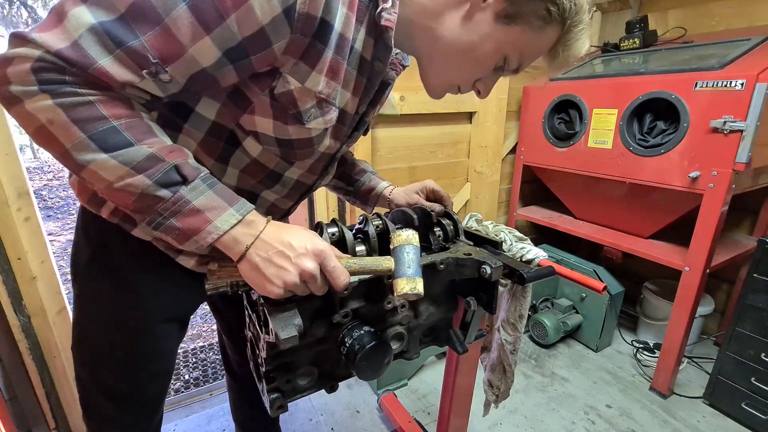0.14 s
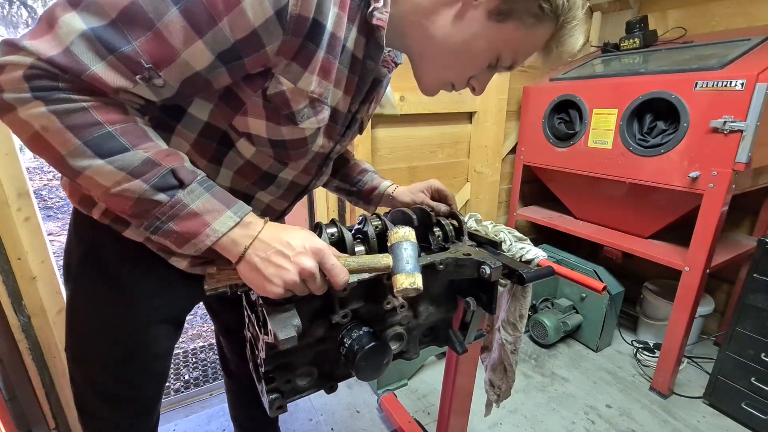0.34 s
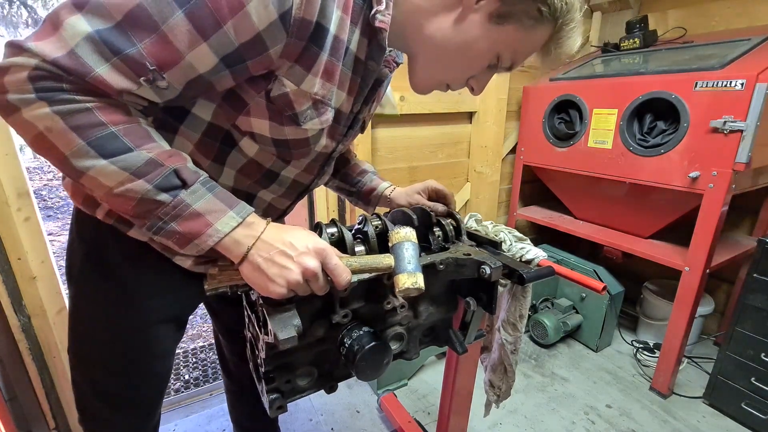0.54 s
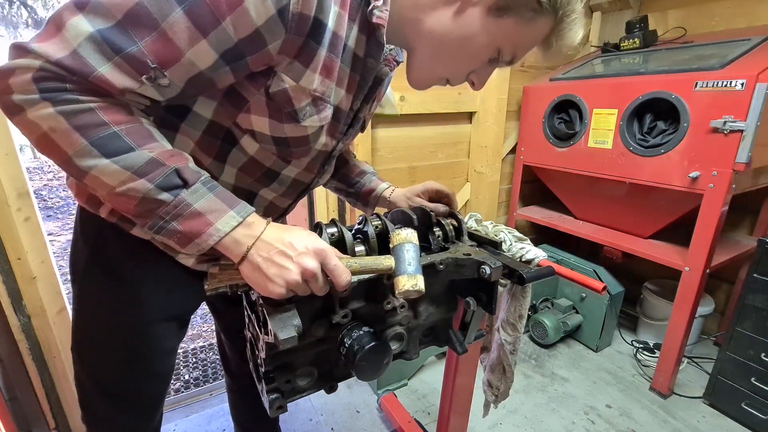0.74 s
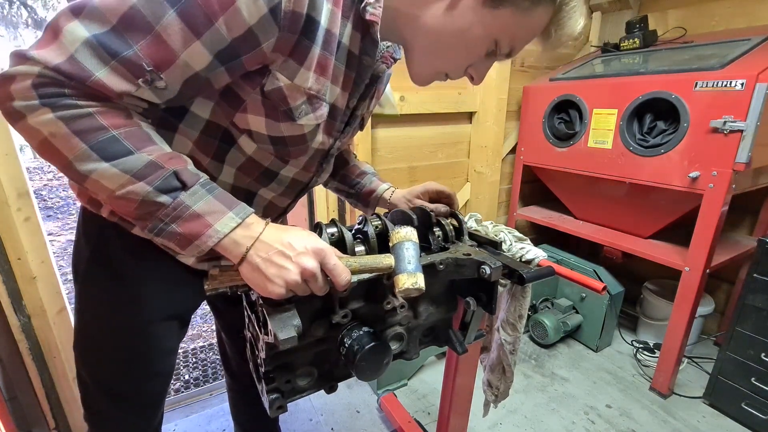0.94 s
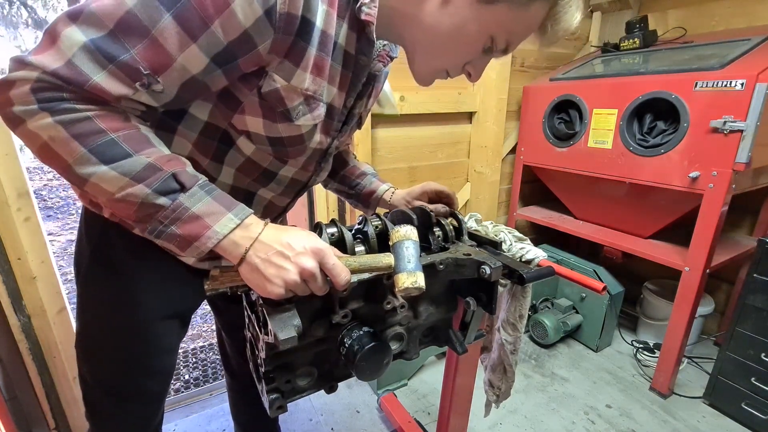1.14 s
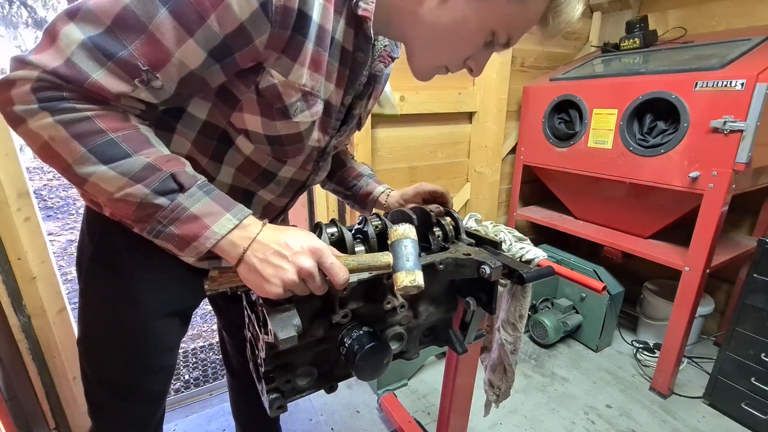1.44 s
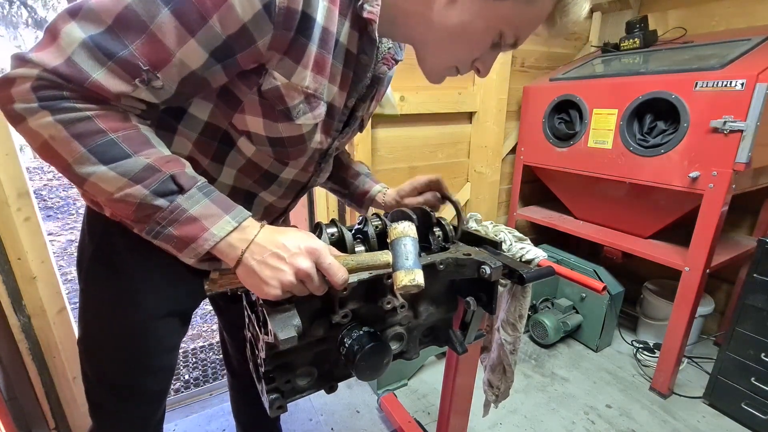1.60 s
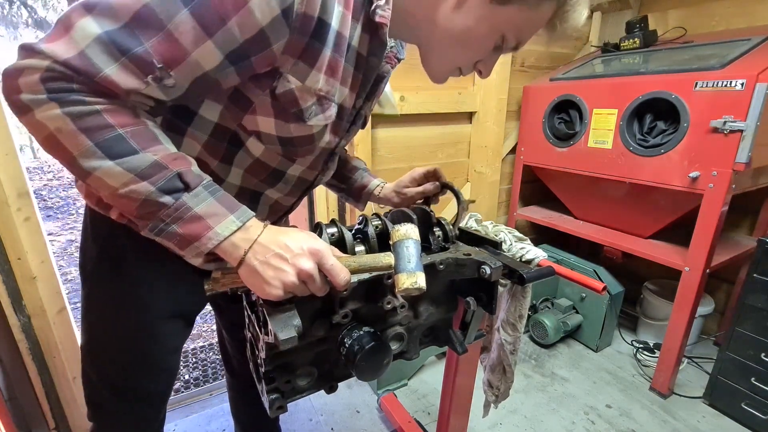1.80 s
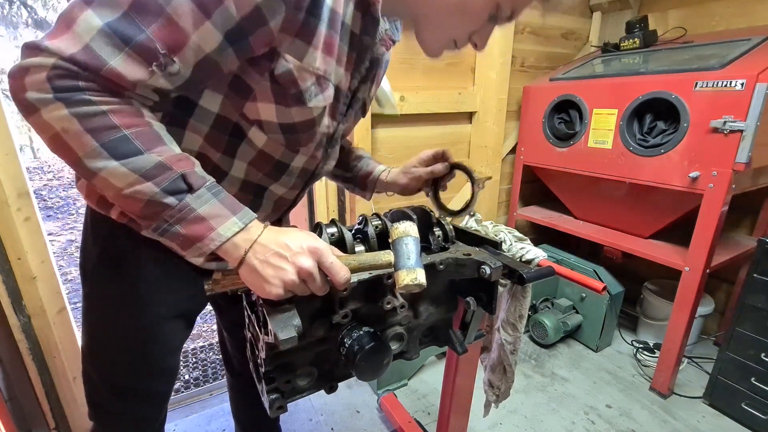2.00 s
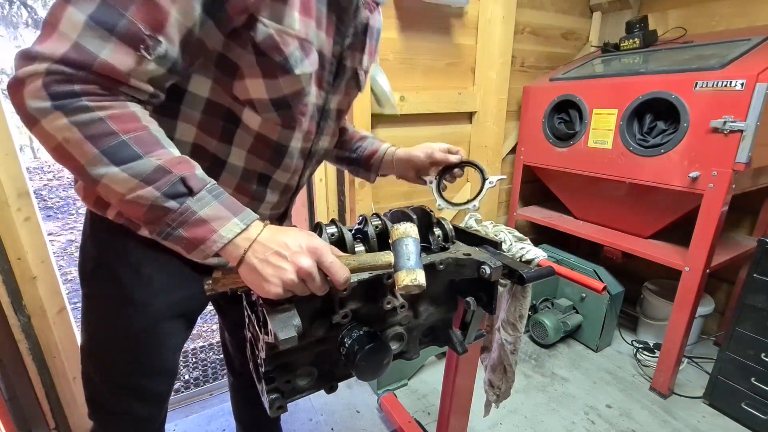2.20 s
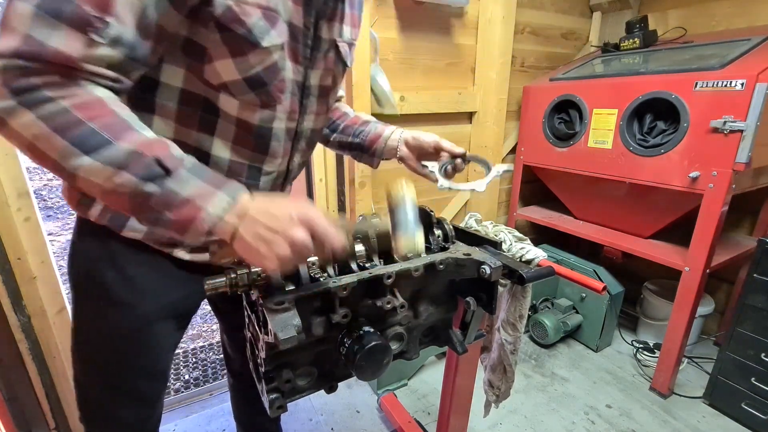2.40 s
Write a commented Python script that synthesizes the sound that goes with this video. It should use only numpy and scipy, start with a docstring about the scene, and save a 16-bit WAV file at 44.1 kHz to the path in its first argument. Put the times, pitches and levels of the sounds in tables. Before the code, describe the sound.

A mallet strikes a metal engine part with a sharp, bright clang; after a pause with faint knocks and a tiny squeak, a second blow loosens it with a short clatter. Small wooden workshop, close stereo microphone.

```python
"""A sleeve rubs over faint hum and hiss, then a hard blow rings out in a small wooden workshop.
A metal seal housing is being knocked loose from an engine block on a stand. Each of two hard blows is a quick
run of contacts; between them the part squeaks and knocks, and afterwards it clatters dully.
Bands of noise make the cracks, dense ringing and air; sine tones make the clear ring of the metal and the hum;
noise in a narrow gliding band makes the squeak."""
import sys
import numpy as np
from scipy import signal
from scipy.fft import rfft, irfft
from scipy.io import wavfile
from scipy.ndimage import uniform_filter1d

SR = 44100
rng = np.random.default_rng(int(sys.argv[2]) if len(sys.argv) > 2 else 0)


def output_pcm(signal):
    """Save a mono or channel-first signal as 16-bit PCM at the path in sys.argv[1].

    Samples are clipped to [-1, 1] before scaling.
    """
    pcm = np.clip(np.atleast_2d(signal).T, -1, 1) * 32767
    wavfile.write(sys.argv[1], SR, np.round(pcm).astype(np.int16))


N = 112454
TIME = np.arange(N) / SR
BANDS_HZ = 25 * 2 ** (np.arange(29) / 3)  # centres of the third-octave bands
TREBLE_HZ = 2410  # the treble slope of a contact starts here

# Every knock, clatter and thump of the stand. Each row: start in seconds, level in dB, extra thump of the
# stand in dB, extra low body in dB, treble slope in dB per octave, centre of the clang in Hz, extra block
# tones in dB, extra housing ring in dB, extra sharp crack in dB.
CONTACTS = [(0.112, -53, 1.5, -10.5, 4, 2592, -1, -10.5, 4.5),
            (0.2228, -7, -1.5, -6.5, 1.5, 2850, -7, -1, 8.5),
            (0.235, 3, -1, -4.5, -2, 2753, -2, -1.5, -1.5), (0.245, -2, -2, 2.5, -5.5, 2690, -4, -1, -8.5),
            (0.46, -57.5, 43.5, 15, -17, 2970, 7.5, -11, -16),
            (0.595, -36.5, -10, 0, -1, 2550, 1.5, -17, 0), (0.62, -46.5, 13, 25, -24, 2670, -5.5, -11, -11),
            (0.789, -68, 5, 29.5, -18, 2600, 3.5, -17, -15),
            (1.263, -23.5, -13.5, -11, -18, 2800, -0.5, -11.5, 0),
            (1.285, -38, -1, 12.5, -7, 2810, -2, -12, -8), (1.5995, -23, 17, 7.5, -7, 2200, -5, 3.5, -6),
            (1.609, -15.5, 8, 8, -4, 2230, 2.5, -5, -13), (1.619, -3.5, -23, -0.5, -4, 2420, -0.5, 3.5, 0),
            (1.641, -7, -23, 4.5, -6, 2350, -5, -0.5, 4.5), (1.682, -23, -28, 8, -6.5, 2450, 3, 17, 7),
            (1.792, -45, -5.5, 20, -31, 2400, -2.5, 19, -7), (1.88, -40.5, 6, 13.5, -8, 2400, 1.5, 23, -10),
            (1.902, -41.5, 11, 20, -24, 2380, -1, -5, -13), (2.223, -58, 2, -15, -5, 3350, -16, -15.5, 9)]


def from_db(db):
    """Turn decibels into gain."""
    return 10 ** (np.asarray(db) / 20)


def at_hz(points, hz):
    """Read a table of (Hz, value) at one pitch, with pitch counted in octaves."""
    table_hz, values = np.transpose(points)
    return np.interp(np.log(hz), np.log(table_hz), values)


def in_time(rows):
    """Draw straight lines between the rows of a control curve, one value per sample."""
    seconds, *columns = np.transpose(rows)
    return [np.interp(TIME, seconds, column) for column in columns]


def panned(db):
    """Left and right gains that differ by this many dB, with the same total power."""
    gains = from_db([[db / 2], [-db / 2]])
    return gains / np.sqrt(np.mean(gains ** 2))


def noise_bands(ripple_db):
    """Third octaves of stereo noise, alike on both sides in the bass; a random ripple makes the treble uneven."""
    # How alike left and right are. Each row: pitch in Hz, correlation (1 means the same).
    likeness = [(50, 0.83), (150, .92), (350, 0.91), (700, 0.0059), (1500, 0.0025), (12000, 0)]
    ripple_step_hz = 49.2
    size = N + SR // 4  # the extra start lets the filters settle
    line_hz = np.arange(size // 2 + 1) * SR / size
    ripple_points = rng.standard_normal(SR // 10)
    ripple = np.interp(line_hz / ripple_step_hz, np.arange(SR // 10), ripple_points)
    ripple_gain = from_db(ripple_db * ripple * line_hz / (line_hz + TREBLE_HZ))
    spectrum = rfft(rng.standard_normal((2, 2, size)))
    white = irfft(spectrum * ripple_gain, size)
    for k, hz in enumerate(BANDS_HZ):
        edges = hz * 2 ** (np.array([-1, 1]) / 6)
        band_filter = signal.butter(3, edges, "band", fs=SR, output="sos")
        pair = signal.sosfilt(band_filter, white[k % 2])[:, -N:]  # neighbours use different noise
        mid, side = pair / pair.std(axis=1, keepdims=True)
        alike = at_hz(likeness, hz)
        stereo = np.sqrt(1 + alike) * mid + np.sqrt(1 - alike) * side * [[1], [-1]]
        yield hz, stereo / np.sqrt(2)


def ringing(db, t60, build_s):
    """Loudness curve of a vibration fed by every contact: its energy builds up, then dies away."""
    kicks = np.zeros(N)
    kicks[(np.array(CONTACTS)[:, 0] * SR).astype(int)] = from_db(db) ** 2
    keep = np.exp(-np.log(1e6) / (t60 * SR))  # falls 60 dB in t60 seconds
    fill = np.exp(-1 / (max(build_s, 1e-5) * SR))
    energy = signal.lfilter([1], [1, -keep], kicks + 1e-20)
    return np.sqrt(signal.lfilter([1 - fill], [1, -fill], energy))


def force_db(hz):
    """How strongly each contact drives one pitch: heavy ones push the bass, hard ones the treble."""
    thump_hz, body_hz = 108, 750  # upper limits of the thump and of the low body
    level, thump, body, slope = np.transpose(CONTACTS)[1:5]
    in_thump = 1 / (1 + (hz / thump_hz) ** 6)
    in_body = 1 / (1 + (hz / body_hz) ** 4)
    treble = slope * max(np.log2(hz / TREBLE_HZ), 0)
    return level + thump * in_thump + body * (in_body - in_thump) + treble


def mains_hum():
    """Steady sine tones of the mains hum."""
    # Each row: pitch in Hz, peak level in dB.
    hum_tones = [(99, -70.5), (200, -67.5), (300, -65.5), (500, -66.5)]
    return sum(from_db(db) * np.sin(2 * np.pi * (hz * TIME + rng.random())) for hz, db in hum_tones)


def air_and_sleeve(bands):
    """Steady hiss of the workshop air, and cloth friction: noise that fades as the sleeve stops rubbing."""
    # Hiss of the air. Each row: pitch in Hz, level in dB per third octave.
    air_table = [(25, -68), (35, -67), (70, -70), (130, -90), (250, -78), (450, -73), (800, -78.5),
                 (1300, -77.5), (2200, -86), (4500, -78), (5400, -83), (6500, -73.5), (8200, -92),
                 (12000, -88), (16000, -93)]
    # Colour of the rubbing cloth. Each row: pitch in Hz, dB per third octave before the fading below.
    sleeve_table = [(30, -54.5), (150, -65), (500, -71.5), (1500, -74), (3000, -77), (6000, -75.5),
                    (10000, -68.5), (15000, -75)]
    # Strength of the rub. Each row: time in seconds, change in dB.
    sleeve_fade = [(0, -0.5), (.1, -7.5), (.2, -1.5), (.26, -24)]
    fade_db, = in_time(sleeve_fade)
    rub = from_db(fade_db)
    out = 0
    for hz, noise in bands:
        air = from_db(at_hz(air_table, hz))
        sleeve = rub * from_db(at_hz(sleeve_table, hz))
        out = out + noise * np.hypot(air, sleeve)  # the powers add
    return out


def friction(curve):
    """Friction noise in a narrow resonance that glides and changes width."""
    hz, width_hz, db = in_time(curve)
    steps = np.cumsum(width_hz) / SR  # a wider resonance wobbles faster
    slips = rng.standard_normal((2, 2, N // 8))
    wobble = np.array([np.interp(steps, np.arange(len(a)), a + 1j * b) for a, b in slips])
    sliding = (TIME > curve[0][0]) & (TIME < curve[-1][0])
    swell = from_db(db) * sliding
    for _ in range(2):
        swell = uniform_filter1d(swell, size=200)  # soft start and end
    carrier = np.exp(2j * np.pi * np.cumsum(hz) / SR)
    return np.real(wobble * carrier) * swell


def seal_squeak():
    """The sliding seal squeaks in a narrow band, and a rougher, wider scrape rises out of it."""
    # Each row: time in seconds, pitch in Hz, width in Hz, relative level in dB.
    squeak_curve = [(1.14, 3020, 90, -79), (1.16, 3080, 110, -67.5), (1.19, 3180, 171, -58.5),
                    (1.255, 3280, 410, -57.5), (1.28, 3330, 400, -75.5)]
    # The rougher scrape, with the same columns.
    scrape_curve = [(1.19, 3400, 302, -76), (1.215, 3620, 700, -58.5), (1.235, 4130, 1120, -55.5),
                    (1.26, 4190, 1110, -54.5), (1.31, 4270, 1000, -73.5)]
    return friction(squeak_curve) + friction(scrape_curve)


def metal_tones(mode_table, ring_db, lag_s, scatter):
    """Struck metal rings in clear sine tones; their mix changes from one stage of the work to the next."""
    # Ends of the first blow, the working loose and the second blow, in seconds; the clatter follows.
    stage_ends = [.4, 1.5, 1.75]
    stage = np.searchsorted(stage_ends, np.array(CONTACTS)[:, 0])
    heard_at = TIME - np.array([[0], [lag_s]])  # the right side hears later
    out = 0
    for hz, *stage_db, t60, pan_db in mode_table:
        # reflections shift the phase of each side, less so in the bass
        side_shift = scatter * hz / (hz + 440) * rng.uniform(-1, 1, (2, 1))
        cycles = rng.random() + side_shift
        tone = np.sin(2 * np.pi * (hz * heard_at + cycles))
        build_s = min(0.0034 + 0.46 / hz, 0.017)  # low tones need longer to build up
        swell = ringing(force_db(hz) + ring_db + np.array(stage_db)[stage], t60, build_s)
        out = out + tone * uniform_filter1d(swell, size=32) * panned(pan_db)
    return out


def block_ring():
    """The heavy block on its stand rings in many tones that die away fairly soon."""
    # Each row: pitch in Hz, dB in the first blow, dB in the light knocks, dB in the second blow,
    # dB in the clatter, time to fall 60 dB in seconds, left minus right in dB.
    block_modes = [(45.1, -23.5, -36, -45, -32, .085, -3), (70, -39, -39, -22, -36, 0.34, -3.5),
                   (101.2, -44, -20.5, -43.5, -26, 0.23, -6), (166.8, -26, -26.5, -27.5, -26, 0.4, -1),
                   (324.4, -23.5, -21.5, -37, -28.5, 0.16, -3.5),
                   (367, -25.5, -17.5, -22.5, -26.5, .27, -2.5), (464, -18, -15, -42.5, -15.5, .27, -6.5),
                   (497, -30.5, -26.5, -20.5, -26, .3, -3), (600, -25, -22, -29, -47, .27, -2),
                   (708, -32, -17, -28, -13, 0.2397, -4), (798, -18, -42, -38, -45, .18, 1.5),
                   (1057, -35.5, -22.5, -22.5, -33, .18, -3), (1206.5, -19.5, -25, -33.5, -20.5, 0.18, -6),
                   (1480, -33, -19.5, -42, -43, .18, -3), (1540, -21, -19.5, -23.5, -38, .18, -4),
                   (1625, -35.5, -16, -26.5, -27, .18, -3), (1791, -23, -28.5, -39, -34, 0.14, -2),
                   (1902, -19.5, -23, -13.5, -16, .2, -1.5), (2085, -20, -21, -22, -27, .15, 2.5),
                   (2160, -34, -50, -22, -9.5, .17, 3), (2400, -28.5, -40, -22, -10.5, .17, 4.5),
                   (2530, -27, -18, -22, -23, .15, 3.5), (2552, -29.5, -20, -20.5, -23.5, .27, 2.5),
                   (2595, -23, -13, -21, -18, .25, 3), (2703, -17, -16.5, -29, -36, .16, 4),
                   (2715, -17, -21, -37, -38, 0.18, 3), (2861, -14.5, -27, -35, -34, .17, 7),
                   (2955, -16, -17, -26, -25, .14, 3), (3095, -30.5, -19, -23.5, -20, .18, 4.5),
                   (3175, -28, -29, -24, -25, .21, 2.5), (3292, -18, -28, -38, -32, .14, 5),
                   (3600, -40, -37, -40, -42, .27, -3.5)]
    block_db = np.transpose(CONTACTS)[6]
    return metal_tones(block_modes, block_db, lag_s=0.0001, scatter=0.42)


def housing_ring():
    """The housing rings on in longer tones, until a hand closes on it and damps them."""
    # Each row: pitch in Hz, dB in the first blow, dB in the light knocks, dB in the second blow,
    # dB in the clatter, time to fall 60 dB in seconds, left minus right in dB.
    housing_modes = [(1873, -35, -27, -26.5, -32, .6, 7), (1933, -28.5, -24, -27.5, -39, .66, -2),
                     (2036, -37, -31, -26, -32, .54, 6.5), (2182, -25, -42, -39, -37, .28, -.5),
                     (2357, -24, -30, -26, -39, .3, 10), (2912, -24.5, -46, -41, -48, .28, 5),
                     (2983, -25.5, -37, -36.5, -41, .36, 11), (3381, -29.5, -43, -49, -52, .28, 4)]
    grip_at_s, grip_db_per_s = 2.04, 107
    housing_db = np.transpose(CONTACTS)[7]
    grip = from_db(-grip_db_per_s * np.maximum(TIME - grip_at_s, 0))
    return grip * metal_tones(housing_modes, housing_db, lag_s=0.00014, scatter=0.053)


def knocks(bands):
    """Each contact cracks, then the dense ring of the block clangs, fills the small room and fades."""
    # Dense ring of the cast block in the room. Each row: pitch in Hz, relative dB per third octave.
    block_colour = [(25, -44.5), (45, -31), (75, -38), (115, -50), (165, -42), (220, -40.5), (370, -26.5),
                    (620, -26), (800, -23), (1000, -24.5), (1600, -23.5), (2200, -23.5), (3000, -22.5),
                    (4000, -23), (6500, -24.5), (9000, -32), (15000, -36)]
    # How long that ring lasts. Each row: pitch in Hz, time to fall 60 dB in seconds.
    block_t60 = [(50, .33), (170, 0.51), (400, 0.2), (1000, 0.19), (2800, 0.21), (6000, .195),
                 (13000, 0.16)]
    # How slowly the room fills with sound. Each row: pitch in Hz, time in seconds.
    room_fill = [(50, 0.01197), (170, 0.01), (450, 0.0056), (1300, .008), (3000, .005), (10000, .004)]
    # Direct crack against the dense ring. Each row: pitch in Hz, dB.
    crack_colour = [(60, -24.5), (400, -11.5), (1300, -5), (3000, 1), (9000, 2.5)]
    # Late echoes of the workshop against the dense ring. Each row: pitch in Hz, dB.
    tail_colour = [(60, -26), (400, -22), (1200, -32.5), (3000, -43.5), (8000, -64)]
    # Stereo balance. Each row: pitch in Hz, left minus right in dB.
    balance = [(60, -3.5), (380, -4), (700, -0.5), (1300, -7), (2400, 4.5), (4400, 2), (8000, 1.5),
               (15000, 0)]
    crack_t60_s, tail_t60_s = 0.03, 0.46
    crack_pan_db = 6.5
    clang_db, clang_octaves = 7, 0.18  # height and width of the clang
    clang_hz, crack_db = np.transpose(CONTACTS)[[5, 8]]
    out = 0
    for hz, noise in bands:
        octaves_off = np.log2(hz / clang_hz)
        clang = clang_db * np.exp(-.5 * (octaves_off / clang_octaves) ** 2)
        db = force_db(hz) + at_hz(block_colour, hz) + clang
        fill_s = at_hz(room_fill, hz)
        crack = ringing(db + crack_db + at_hz(crack_colour, hz), crack_t60_s, 0) * panned(crack_pan_db)
        dense = ringing(db, at_hz(block_t60, hz), fill_s)
        tail = ringing(db + at_hz(tail_colour, hz), tail_t60_s, fill_s)
        swell = np.sqrt(crack ** 2 + dense ** 2 + tail ** 2)
        cycle = int(SR / max(hz, 500))
        for _ in range(2):
            swell = uniform_filter1d(swell, cycle)  # a band needs about a cycle to start
        out = out + noise * swell * panned(at_hz(balance, hz))
    return out


def scene():
    """Knocks, ringing metal and squeak over the quiet workshop."""
    background = air_and_sleeve(noise_bands(ripple_db=0)) + mains_hum()
    metal = block_ring() + housing_ring()
    return background + seal_squeak() + metal + knocks(noise_bands(ripple_db=5))


def record(dry):
    """Round off the loudest peaks, then cut the very top of the treble."""
    clip_top, cutoff_hz = 1.3, 16900
    rounded = clip_top * np.tanh(dry / clip_top)
    top_cut = signal.cheby2(20, 95, cutoff_hz, fs=SR, output="sos")
    return signal.sosfilt(top_cut, rounded)


dry = scene()
out = record(dry)
output_pcm(out)
```